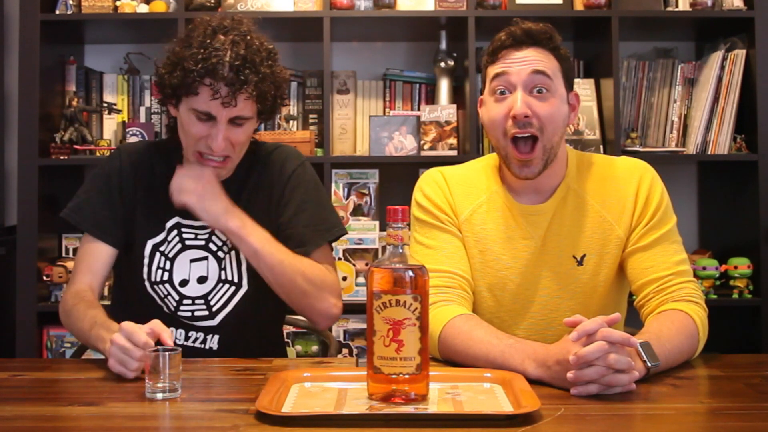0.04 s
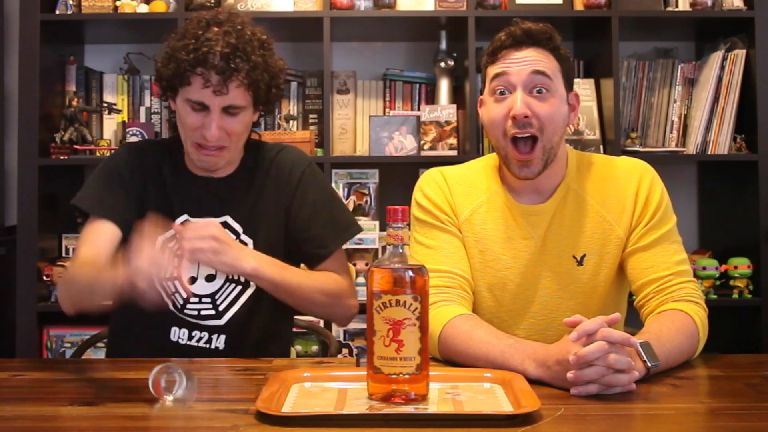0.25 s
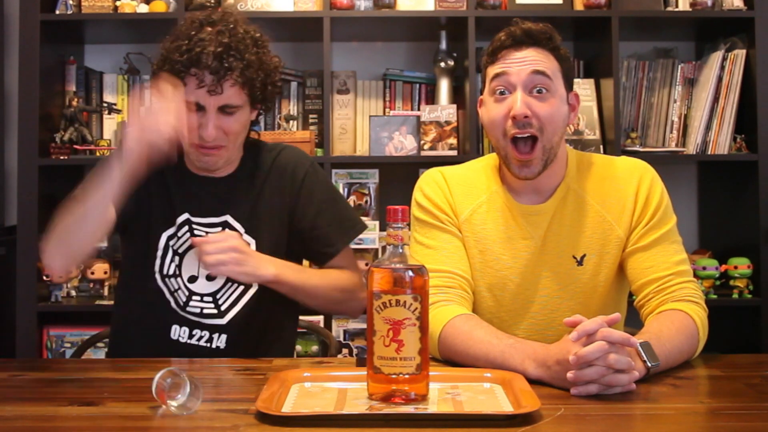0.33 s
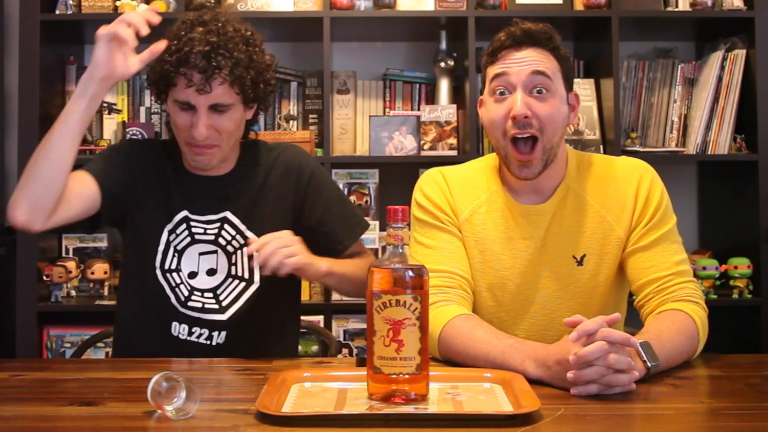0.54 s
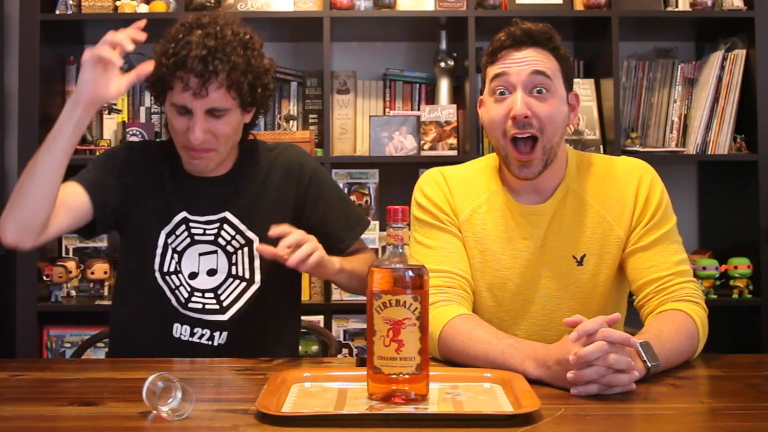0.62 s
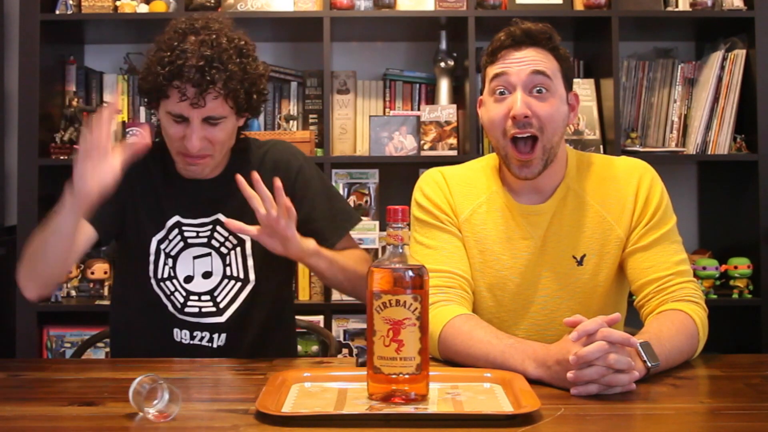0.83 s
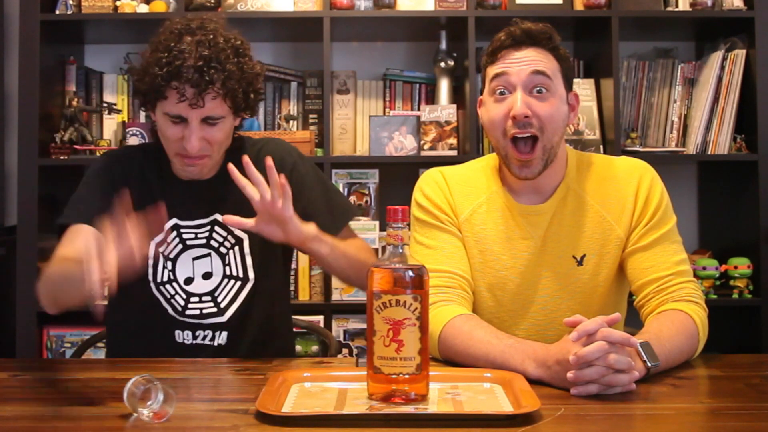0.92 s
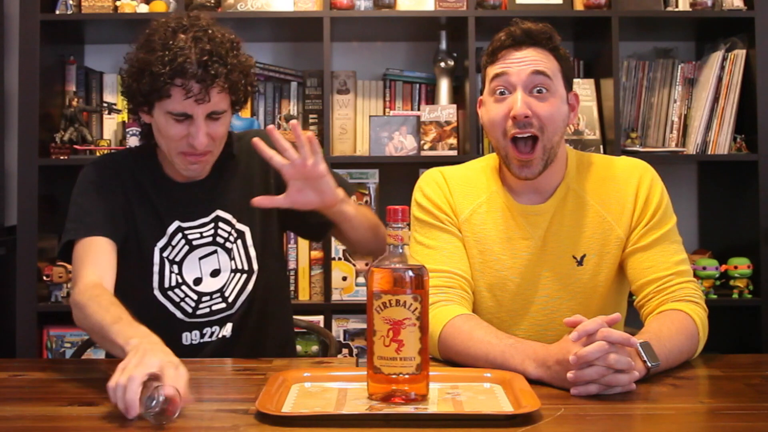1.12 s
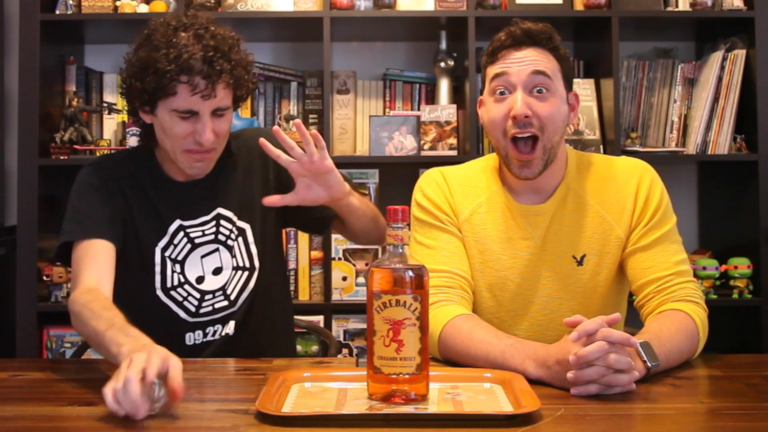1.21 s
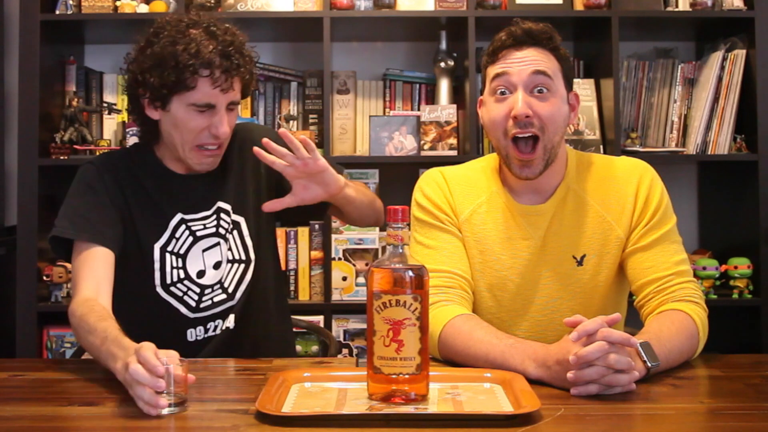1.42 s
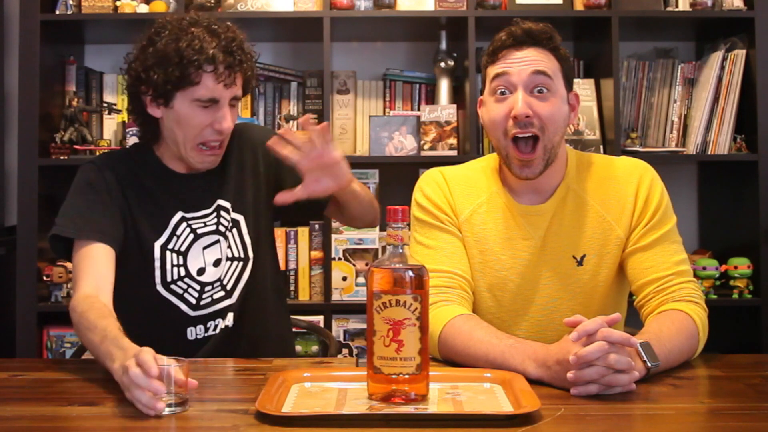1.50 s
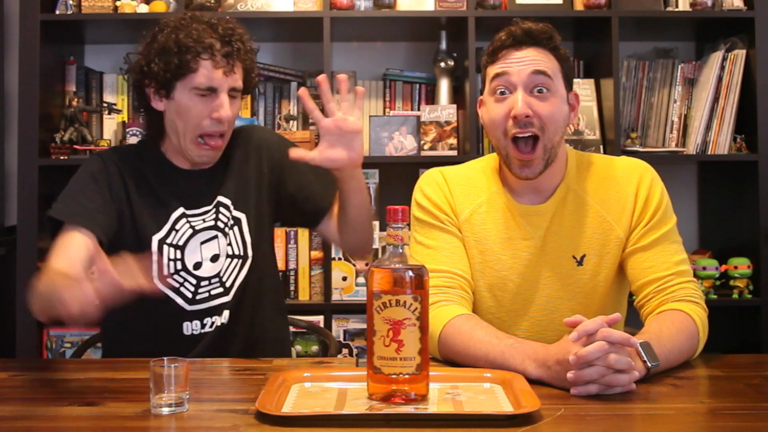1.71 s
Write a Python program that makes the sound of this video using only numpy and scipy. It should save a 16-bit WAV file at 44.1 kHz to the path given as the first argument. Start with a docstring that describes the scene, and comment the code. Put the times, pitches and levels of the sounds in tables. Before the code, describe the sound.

A shot glass knocks on a wooden table in a small room, heard close. A dull contact at 0.2 s leads into a loud, cracking clatter at 0.32-0.39 s, with a bright brief ping and low boom. Quiet rumble and thin hiss follow, a small tick near 0.63 s, faint rolling bumps around 1.1-1.2 s, then a hard, duller woody knock at 1.41 s and a light click at 1.49 s.

```python
"""A shot glass is put down on a wooden table in a small room, topples with a loud clatter and bounces.
It rolls briefly under a hand and is stood up again with a hard knock.
Each blow excites decaying table modes, shaped noise and a dry crack; slow sines add a low boom.
The glass pings in decaying sines, its edge ticks in short noise bursts, and rolling is a run of random bumps.
Bands of noise make the faint room rumble and hiss."""
import sys
import numpy as np
from scipy import signal
from scipy.io import wavfile

SR = 44100
rng = np.random.default_rng(int(sys.argv[2]) if len(sys.argv) > 2 else 0)


def transcribe(u):
    """Save the signal u as a 16-bit wav file named by the first command-line argument.

    u: samples, shape (n,) or (channels, n), limited to [-1, 1]; the rate is SR.
    q: integer samples, one column per channel.
    """
    v = np.clip(np.atleast_2d(u).T, -1, 1)
    q = np.round(v * 32767).astype(np.int16)
    wavfile.write(sys.argv[1], SR, q)


N = 77175
T = np.arange(N) / SR
# glass mode frequencies
RIM_HZ, RIM_TWIN_HZ, RIM_SECOND_HZ, RIM_THIRD_HZ = 4393, 4372, 8025, 13950


def amp(db):
    """Decibels to gain."""
    return 10 ** (np.asarray(db) / 20)


def fade(t60_s):
    """Exponential decay from 1, down 60 dB after t60_s."""
    return np.exp(-np.log(1000) * T / t60_s)


def at_hz(rows, hz, axis=1):
    """Read a table column, interpolated on a log-frequency axis."""
    rows = np.array(rows)
    return np.interp(np.log(hz), np.log(rows[:, 0]), rows[:, axis])


def band_pass(x, low_hz, high_hz):
    """Butterworth band-pass."""
    sos = signal.butter(2, [low_hz, high_hz], "band", fs=SR, output="sos")
    return signal.sosfilt(sos, x)


def low_pass(x, hz, order):
    """Butterworth low-pass."""
    sos = signal.butter(order, min(hz, 0.45 * SR), fs=SR, output="sos")
    return signal.sosfilt(sos, x)


def noise_bands():
    """White noise split into bands of under half an octave: (centre Hz, samples)."""
    edges_hz = np.geomspace(18, 17000, 23)
    white = rng.standard_normal((2, N + 8000))  # two sources: adjacent bands are independent
    for k, (low_hz, high_hz) in enumerate(zip(edges_hz, edges_hz[1:])):
        band = band_pass(white[k % 2], low_hz, high_hz)
        yield np.sqrt(low_hz * high_hz), band[-N:]  # filter start-up dropped


def coloured_noise(colour):
    """Sum of noise bands, each at the level the table gives for its centre."""
    return sum(amp(at_hz(colour, hz)) * band for hz, band in noise_bands())


def add(out, start_s, sound):
    """Mix a sound in from start_s."""
    start = int(start_s * SR)
    out[start:] += sound[:N - start]


def ringing(modes):
    """Decaying sines of alternating sign, each struck with a random strength."""
    spread_db = 3
    out = np.zeros(N)
    for k, (hz, db, t60_s) in enumerate(modes):
        strength = (-1) ** k * amp(db + spread_db * rng.standard_normal())
        out += strength * np.sin(2 * np.pi * hz * T) * fade(t60_s)
    return out


def knocks():
    """Each blow cracks and rings the table; softer contacts are duller, a hand behind the glass adds thud."""
    # blows: (time [s], level [dB], contact cut-off [Hz], gain of the thud range [dB], crack level [dB])
    blows = [(0.2094, -14.5, 848, 3, 2.5), (0.2212, -18.5, 470, 3, -3), (0.3172, -23.5, 1390, -31, 4),
             (0.3193, -3, 8250, -8.5, 1.5), (0.3290, -3.5, 7070, -0.5, -9.5),
             (0.3680, -3.5, 2760, 1.5, 3.5), (0.39, -14.5, 5000, 1.5, -7), (0.9320, -33.5, 685, 1, 0.5),
             (1.078, -29.5, 172.2, 15.5, -8), (1.116, -29, 158, 3.5, -14), (1.2000, -32.5, 455, 6, -2.5),
             (1.4070, -5, 1910, 5, 6), (1.4140, -3.5, 990, -6.5, -22)]
    # dry crack at the contact: (frequency [Hz], level [dB], t60 [s])
    crack_modes = [(881, -6.5, .012), (1426, -8, 0.02), (2366, -4, 0.0051), (3030, -7, .006)]
    edge_db = -24  # share of a blow that the hard glass edge passes on undulled
    thud_hz = 264
    crack_cut_ratio = 1.47  # crack cut-off over ring cut-off
    out = np.zeros(N)
    for start_s, db, cut_hz, thud_db, crack_db in blows:
        wood = tabletop()
        body = low_pass(wood, cut_hz, order=3) + amp(edge_db) * wood
        body = body + (amp(thud_db) - 1) * low_pass(body, thud_hz, order=1)
        crack = low_pass(ringing(crack_modes), crack_cut_ratio * cut_hz, order=3)
        add(out, start_s, amp(db) * (body + amp(crack_db) * crack))
    return out


def tabletop():
    """The table's answer to one sharp blow: main modes, dense modes and the room's tail."""
    # main modes: (frequency [Hz], level [dB], t60 [s])
    main_modes = [(104.2, -25.5, .4), (150.6, -34, 0.56), (195.1, -27.5, 0.888), (219.2, -22.5, .55),
                  (309.8, -22.5, 0.325), (337.1, -13.5, 0.36), (428.1, -32.5, 0.32), (534.4, -22.5, .24),
                  (746.6, -25, 0.37), (800, -32, 0.33), (832.3, -21, 0.32), (912.6, -20, 0.26),
                  (1070, -21, 0.26), (1267, -43, 0.49), (1446, -20.5, 0.17), (1637, -29.5, 0.3)]
    # dense modes blended with the room: (frequency [Hz], density [dB re unit white noise], t60 [s])
    dense_modes = [(39.4, -27.5, 0.67), (84.1, -4.5, 0.5), (176.4, -2.5, 0.67), (334, -2.5, .34),
                   (694, -2, .28), (1300, -3.5, 0.26), (2270, -5.5, 0.26), (4444, -14, .29),
                   (8250, -23, 0.31), (10600, -32, .25), (15000, -33.5, 0.15)]
    modes_db = -1
    early_db, early_t60_s = 5, 0.042
    late_db, late_t60_s = -23, 0.75
    build_s = 0.00083  # time constant
    shared = amp(early_db) * fade(early_t60_s) + amp(late_db) * fade(late_t60_s)
    dense = np.zeros(N)
    for hz, band in noise_bands():
        decay = fade(at_hz(dense_modes, hz, axis=2)) + shared
        dense += amp(at_hz(dense_modes, hz)) * band * decay
    return dense * (1 - np.exp(-T / build_s)) + amp(modes_db) * ringing(main_modes)


def booms():
    """The lowest resonance of table and room, woken by hard blows, swells and lingers."""
    # boom onsets: (time [s], level [dB])
    onsets = [(0.321, -30.5), (1.408, -30.5)]
    boom_hz, boom_t60_s, rise_s = 75.05, 1.6, 0.02  # rise is a time constant
    swell = fade(boom_t60_s) * (1 - np.exp(-T / rise_s))
    boom = np.sin(2 * np.pi * boom_hz * T) * swell
    out = np.zeros(N)
    for start_s, db in onsets:
        add(out, start_s, amp(db) * boom)
    return out


def pings():
    """The glass rings when its wall meets the wood; reflections make the ring waver."""
    # strikes: (time [s], level [dB], t60 of the extra damping by fingers or wood [s])
    strikes = [(0.2237, -43, 0.56), (0.3211, -12.5, 2.1), (1.077, -57.5, .12), (1.123, -50, 0.16),
               (1.1460, -60, 0.11), (1.1700, -53, .1)]
    # glass modes, the lowest a beating pair: (frequency [Hz], level [dB], t60 [s])
    glass_modes = [(RIM_HZ, -7, 0.34), (RIM_TWIN_HZ, -21.5, 0.8), (RIM_SECOND_HZ, -1.2, 0.11),
                   (RIM_THIRD_HZ, -22.5, .06)]
    room_db, room_t60_s = -10.5, 0.26
    room = rng.standard_normal(N) * fade(room_t60_s)
    room = amp(room_db) * room / np.linalg.norm(room)
    out = np.zeros(N)
    for start_s, db, t60_s in strikes:
        add(out, start_s, amp(db) * ringing(glass_modes) * fade(t60_s))
    return out + signal.fftconvolve(out, room)[:N]


def ticks():
    """Tiny hard contacts of glass edge and fingernails: noise bursts with a faint room tail."""
    # contacts: (time [s], level [dB], centre [Hz], band edge over centre [ratio, raised to 1.03 if less])
    contacts = [(0.116, -46.5, 5940, 1.5), (0.156, -49, 5000, 1.9), (0.2092, -39.5, 13800, 1.1),
                (0.2100, -35, 2400, 1.3), (0.2245, -46, 13800, 1.12), (0.257, -44, 7000, 1.14),
                (0.32, -25, 12100, 0.79), (0.3702, -26, 11900, 1.2), (0.627, -30, 4270, 1.14),
                (0.993, -34.5, 3200, 1.32), (1.396, -36, 3100, 1.9), (1.402, -32, 3860, 1.7),
                (1.4071, -19, 4400, 1.74), (1.4076, -28.5, 12000, 1.6), (1.42, -20.5, 7500, 1.32),
                (1.4938, -25.5, 5840, 1.63), (1.4941, -16, 5300, 1.23)]
    burst_s = 0.0012  # time constant
    room_db, room_t60_s = -22.5, 0.26
    shape = np.exp(-T / burst_s) + amp(room_db) * fade(room_t60_s)
    out = np.zeros(N)
    for start_s, db, hz, width in contacts:
        ratio = max(width, 1.03)
        burst = rng.standard_normal(N) * shape
        add(out, start_s, amp(db) * band_pass(burst, hz / ratio, min(hz * ratio, 0.45 * SR)))
    return out


def roll():
    """The glass rolling on its side gives the table a run of small random bumps."""
    # rolling level: (time [s], level [dB])
    roll_level = [(1.085, -52.5), (1.11, -38), (1.135, -41.5), (1.165, -42), (1.21, -57.5), (1.26, -59)]
    bumps_per_s, cut_hz = 400, 760
    level_db = np.interp(T, *np.transpose(roll_level), left=-200, right=-200)
    hits = rng.random(N) < bumps_per_s / SR
    bumps = hits * rng.choice([-1, 1], N) * amp(level_db)
    return low_pass(signal.fftconvolve(bumps, tabletop())[:N], cut_hz, order=1)


def background():
    """Low room rumble and a thin hiss that swells and sinks, both coloured noise."""
    # room tone: (frequency [Hz], density [dB re unit white noise])
    room_tone = [(20, -19), (30, -13), (50, -28), (75, -27.5), (130, -37), (260, -33.5), (500, -46),
                 (1200, -53), (3000, -62.5), (8000, -69), (16000, -71.5)]
    # hiss spectrum: (frequency [Hz], density [dB re unit white noise])
    hiss_colour = [(300, -2.5), (2500, 3.5), (6000, -4), (10000, -5.5), (15000, -10)]
    # hiss gain: (time [s], level [dB])
    hiss_level = [(0, -49.5), (.19, -82), (.45, -59.5), (.66, -52.5), (.785, -53.5), (.81, -66.5),
                  (1.38, -62), (1.55, -54), (1.75, -55.5)]
    hiss_gain = amp(np.interp(T, *np.transpose(hiss_level)))
    return coloured_noise(room_tone) + coloured_noise(hiss_colour) * hiss_gain


def scene():
    """Mono mix of all sources."""
    return (knocks() + booms() + pings() + ticks() + roll() + background())[None]


def record(dry):
    """Round the loudest peaks softly, then cut the top steeply."""
    cutoff_hz = 15400
    sos = signal.ellip(10, 0.2, 80, cutoff_hz, fs=SR, output="sos")
    return signal.sosfilt(sos, np.tanh(dry))


dry = scene()
out = record(dry)
transcribe(out)
```